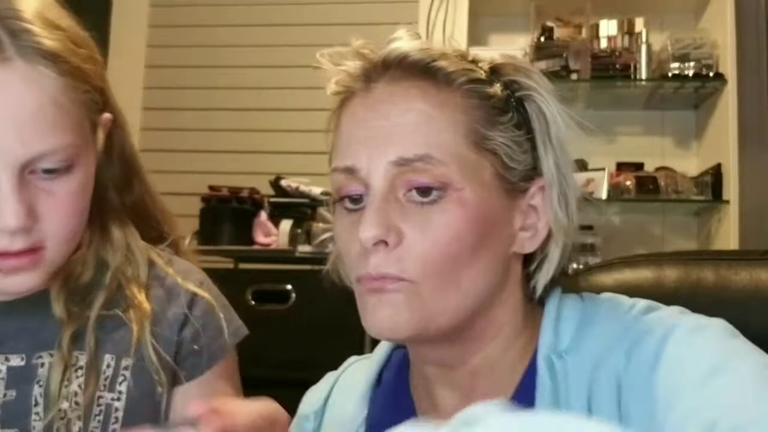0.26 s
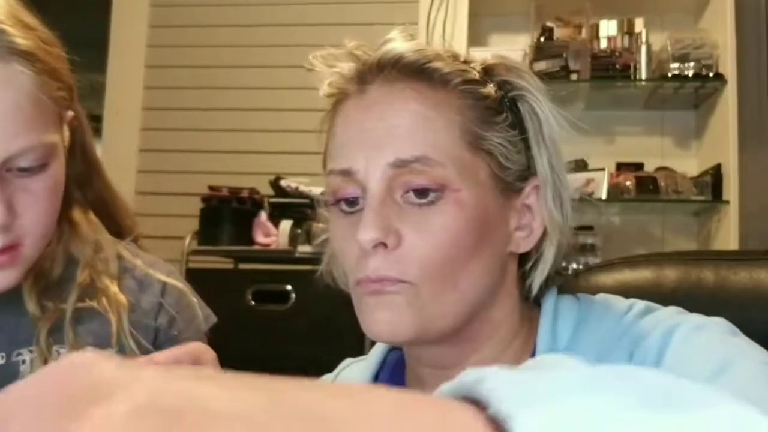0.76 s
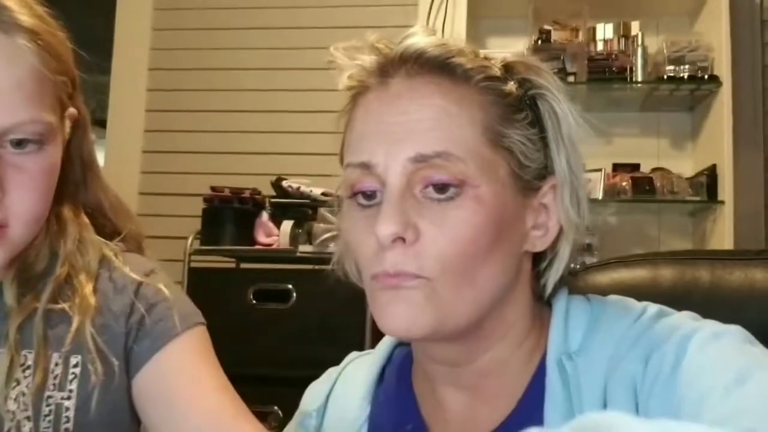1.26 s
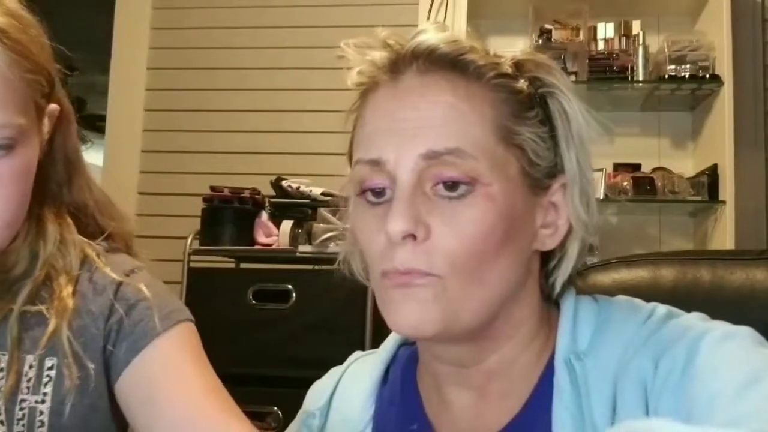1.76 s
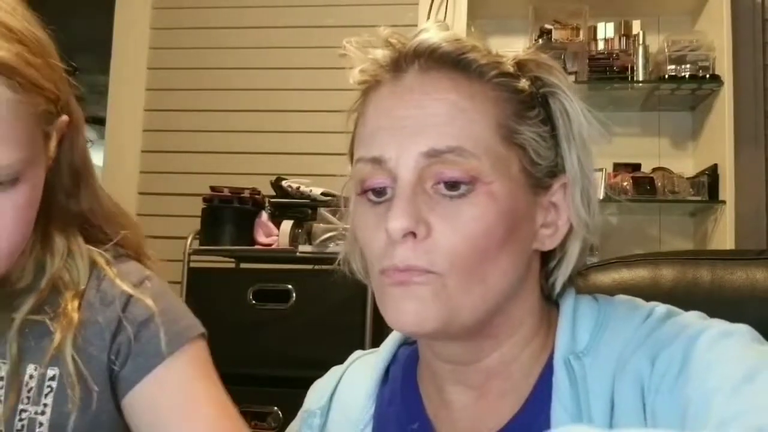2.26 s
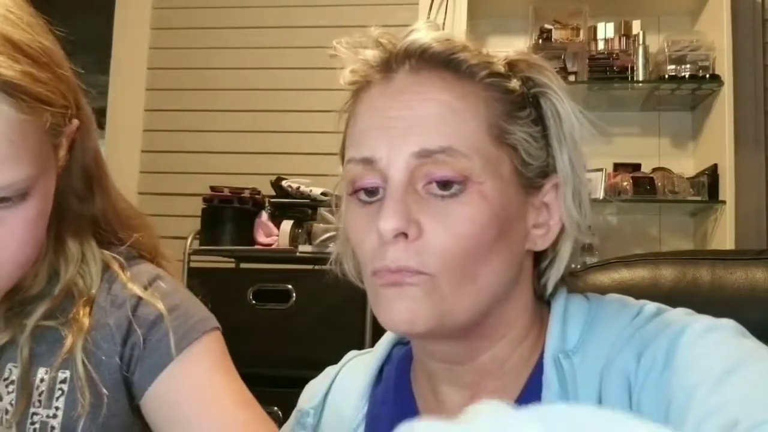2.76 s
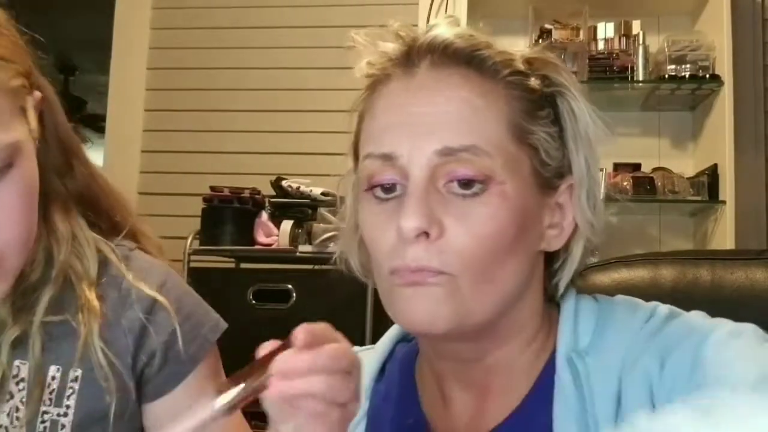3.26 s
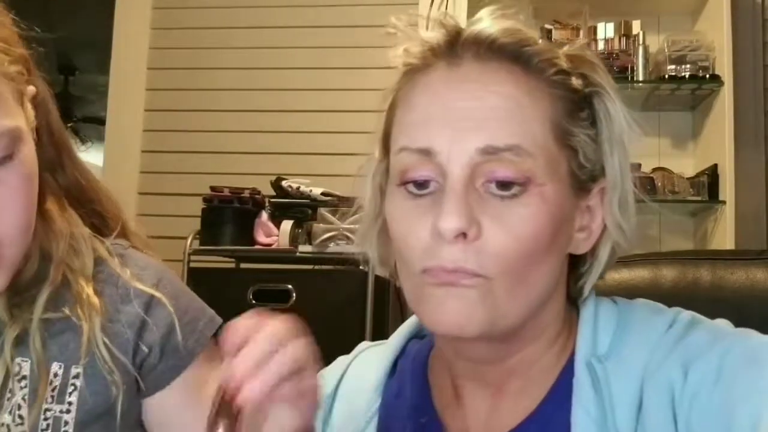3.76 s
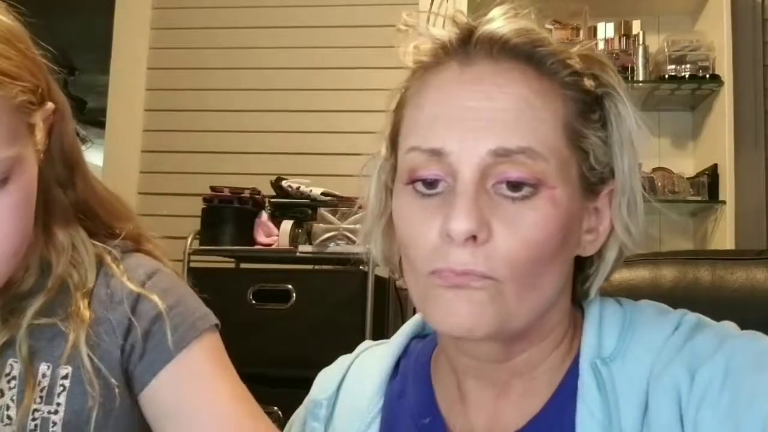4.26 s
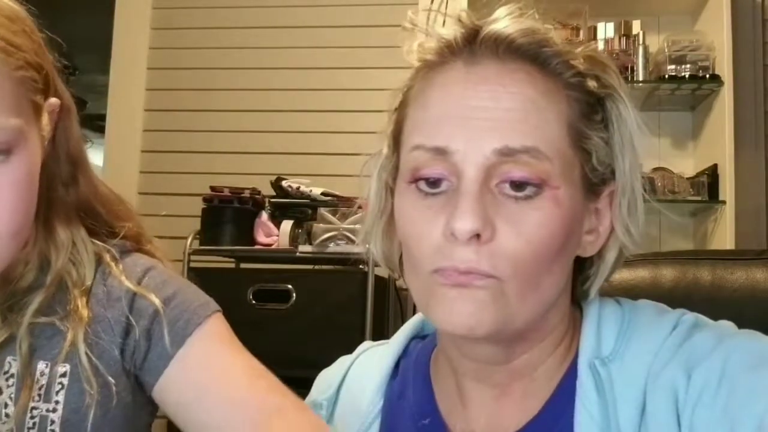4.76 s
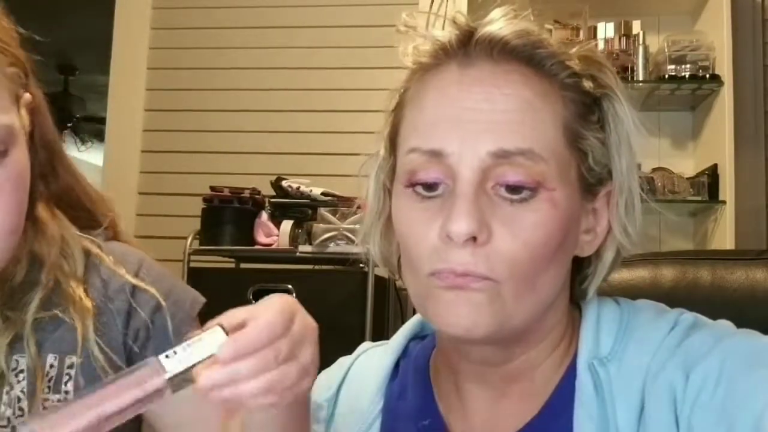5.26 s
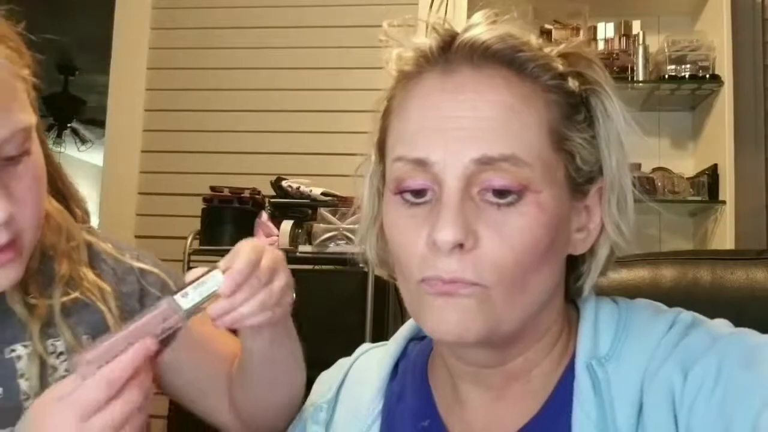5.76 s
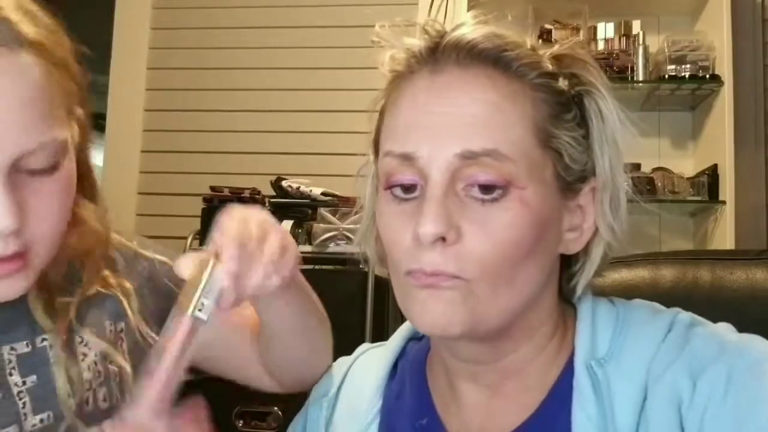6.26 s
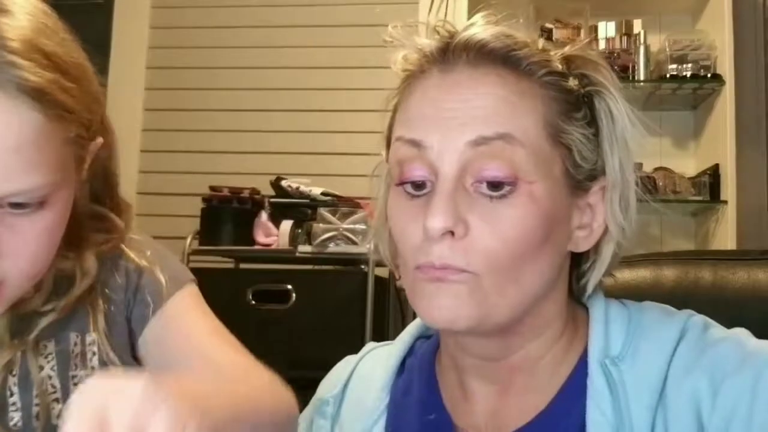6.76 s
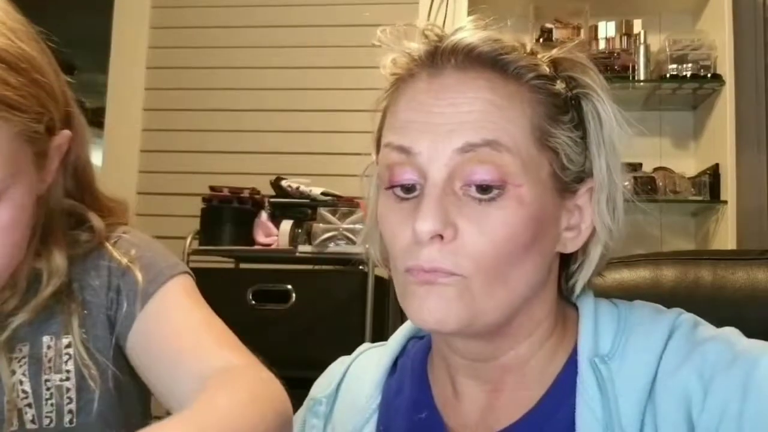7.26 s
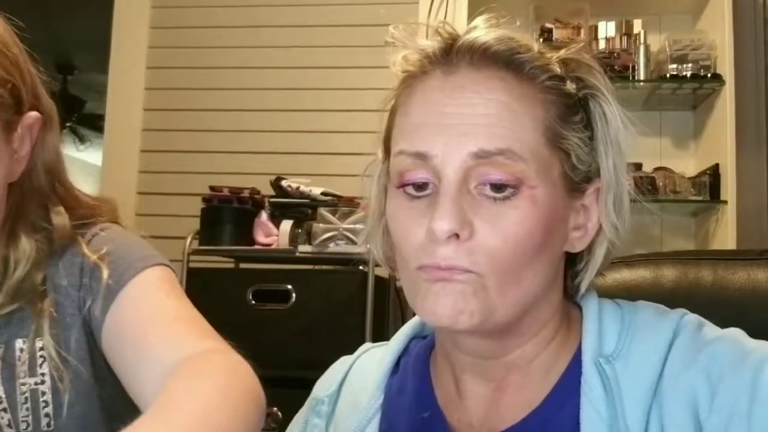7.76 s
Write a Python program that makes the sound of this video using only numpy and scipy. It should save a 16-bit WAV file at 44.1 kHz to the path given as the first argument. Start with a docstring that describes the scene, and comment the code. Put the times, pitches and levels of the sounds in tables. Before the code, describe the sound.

Hard plastic makeup cases and tubes clatter, click and scrape on a table in a small quiet room, with uneven pauses between handlings.

```python
"""A small room: plastic makeup cases and tubes are picked up, sorted and set down on a table close by.
Contacts sum damped modes of cases and table with noise bursts for the clicks of hard shells.
Shaped noise and slip impulses make the slides and rummaging; swept sines make a squeak and a chirp.
Sleeves rumble in low noise over a quiet room tone; short noise tails give the room's answer."""
import sys
import numpy as np
from scipy import signal
from scipy.fft import rfft, irfft, next_fast_len
from scipy.io import wavfile
from scipy.ndimage import map_coordinates

SR = 44100
rng = np.random.default_rng(int(sys.argv[2]) if len(sys.argv) > 2 else 0)


def store_pcm(level_fs):
    """Save levels as 16-bit WAV."""
    pcm = np.round(np.clip(level_fs, -1, 1) * 32767).astype(np.int16)
    wavfile.write(sys.argv[1], SR, np.atleast_2d(pcm).T)


N = 352844
HIT_T = np.arange(6144) / SR  # time axis of one hit [s]
BLOW = round(0.012 * SR)  # opening of a hit that sets its level [samples]
CASE_HZ = 1204  # pitch of a typical case

# modes of table and cases: (frequency [Hz], relative level [dB], t60 [s])
BODY_MODES = [(146, -19, 0.18), (380, -10, .03), (463, -1, 0.039), (536, -0.5, .035), (611, 6, 0.03),
              (794, -2.5, 0.025), (914.4, -3, 0.047), (995, -0.5, 0.051), (1116, -1.5, 0.071),
              (1271, 0, .052), (1424, 0, 0.04), (1588.4, -8.5, 0.057), (1766, 1, 0.058), (1902, 4, 0.029),
              (2215, -9.5, .05), (2398, -7, .05), (2493, -4.5, 0.087), (2891, -13.5, 0.03)]
# low, middle and high range of the modes: (from [Hz], to [Hz])
MODE_RANGES = [(130, 700), (700, 1600), (1700, 2900)]
# spectrum of arm and hand weight on the table: (frequency [Hz], relative level [dB])
RUMBLE_SPECTRUM = [(30, -37.5), (70, 4.5), (115, -4.5), (155, 11), (220, -2), (390, -4), (520, -20.5),
                   (2500, -53.5)]
# a hand reaches in: (start [s], end [s], arm rumble [dB], finger rub [dB])
HAND_REACHES = [(0, .68, -54.5, -59), (1.4, 2.31, -54.5, -61.5), (2.399, 2.613, -47.5, -49),
                (3.051, 3.952, -57.5, -65.5), (4.049, 4.854, -57, -61.5), (4.948, 5.549, -55.5, -55),
                (5.598, 6.162, -61.5, -75), (6.357, 7.248, -49.5, -52), (7.372, 7.814, -56, -60.5)]


def amp(db):
    """Decibels to gain."""
    return 10 ** (np.asarray(db) / 20)


def unit(x):
    """Scale to rms 1."""
    return x / np.sqrt(np.mean(x ** 2) + 1e-20)


def unit_blow(x):
    """Scale a hit to rms 1 over its opening."""
    return x / np.sqrt(np.mean(x[..., :BLOW] ** 2) + 1e-20)


def along(points, hz):
    """Interpolate (Hz, value) points on a log frequency axis."""
    f, v = np.transpose(points)
    return np.interp(np.log(hz + 1), np.log(f), v)


def wobble(rate_hz, size=N):
    """Smooth random curve with rate_hz knots a second."""
    knots = rng.standard_normal(int(size * rate_hz / SR) + 4)
    return map_coordinates(knots, [np.arange(size) * rate_hz / SR])


def spread(hz):
    """Mid-side angle: the channels agree in the bass and less towards the treble."""
    # (frequency [Hz], correlation of left and right [0-1])
    likeness = [(100, 0.96), (500, 0.77), (1200, 0.74), (2400, 0.36), (4500, 0.019)]
    return np.arccos(np.clip(along(likeness, hz), 0, 1)) / 2


def noise(gain, size=N):
    """Stereo noise of rms 1, coloured by a gain function of frequency."""
    m = next_fast_len(size)
    hz = np.fft.rfftfreq(m, 1 / SR)
    mid_side_gain = [np.cos(spread(hz)), np.sin(spread(hz))]
    spectrum = rfft(rng.standard_normal((2, m))) * gain(hz) * mid_side_gain
    mid, side = irfft(spectrum, m)[:, :size]
    return unit(np.array([mid + side, mid - side]))


def colour(points, ripple_db=0):
    """Gain function of a spectrum, with random ripples along it."""
    knots_hz = np.linspace(0, SR / 2, 64)
    ripple = ripple_db * rng.standard_normal(len(knots_hz))
    return lambda hz: amp(along(points, hz) + np.interp(hz, knots_hz, ripple))


def fade(t60_s, attack_s):
    """Envelope of a blow: exponential rise and decay."""
    return amp(-60 * HIT_T / t60_s) * (1 - np.exp(-HIT_T / attack_s))


def modes_within(lo_hz, hi_hz):
    """Body modes of one frequency range."""
    return [mode for mode in BODY_MODES if lo_hz <= mode[0] < hi_hz]


def ring(modes, scatter_db, attack_s):
    """Damped modes start nearly in step, so close ones beat; their phase differs between channels."""
    hz, db, t60_s = np.transpose(modes)[:, :, None]
    strength, start, offset = rng.standard_normal((3, len(hz), 1))
    swing = amp(db + scatter_db * strength) * fade(t60_s, attack_s)
    phase = 2 * np.pi * (hz * HIT_T + 0.12 * start)
    channels = [np.sum(swing * np.sin(phase + side * offset * spread(hz)), axis=0) for side in (1, -1)]
    return unit_blow(np.array(channels))


def add(track, start_s, sound):
    """Mix a sound into a track at a time."""
    i = max(round(start_s * SR), 0)
    part = track[:, i:i + sound.shape[1]]
    part += sound[:, :part.shape[1]]


def noise_burst(gain, t60_s, attack_s):
    """Coloured noise struck once and dying away."""
    return unit_blow(noise(gain, size=len(HIT_T)) * fade(t60_s, attack_s))


def shell_click():
    """A sharp snap and the dense ringing of a hard shell, a few modes standing out."""
    # (frequency [Hz], relative level [dB])
    click_spectrum = [(1500, -32.5), (3000, 2), (3600, -7), (4400, 5), (5300, 4.5), (6500, -3), (8300, 3),
                      (11000, -10.5), (14300, -5)]
    snap = noise_burst(colour(click_spectrum), t60_s=0.0013, attack_s=0.00024)
    dense = noise_burst(colour(click_spectrum, ripple_db=1.0), t60_s=0.03, attack_s=0.00063)
    clear_modes = [(hz, 0, 0.045) for hz in rng.uniform(4000, 12500, size=7)]
    clear = ring(clear_modes, scatter_db=2.5, attack_s=0.00035)
    return unit_blow(dense + amp(-6.5) * snap + amp(-6) * clear)


def body_band(edges_hz, crack_db, crack_t60_s):
    """Modes of one range ring together with a noise crack that stands for many damped ones."""
    lo, hi = edges_hz
    band = lambda hz: 1 / (1 + (lo / (hz + 1)) ** 8) / (1 + (hz / hi) ** 12)
    crack = noise_burst(band, crack_t60_s, attack_s=0.0017)
    return unit_blow(ring(modes_within(lo, hi), scatter_db=4.0, attack_s=0.0015) + amp(crack_db) * crack)


def contact(pitch_hz, knock_db, click_db, thud_under_db):
    """A contact thuds in the table, knocks a hollow case, clacks and clicks in its hard shell."""
    low, middle, high = MODE_RANGES
    # smaller, higher cases clack more and thud less
    small_db = 11.5 * np.log2(pitch_hz / CASE_HZ)
    thud_db = knock_db + thud_under_db - small_db
    # clack level follows a point between knock and click
    clack_db = knock_db + 0.3 * (click_db - knock_db) - 6.5 + small_db

    thud = body_band(low, crack_db=-12, crack_t60_s=0.031)
    case = ring([(pitch_hz, 0, 0.035)], scatter_db=0, attack_s=0.00077)
    knock = unit_blow(body_band(middle, crack_db=-10, crack_t60_s=0.062) + amp(-2.0) * case)
    clack = body_band(high, crack_db=-5.5, crack_t60_s=0.075)
    hit = amp(thud_db) * thud + amp(knock_db) * knock
    hit = hit + amp(clack_db) * clack + amp(click_db) * shell_click()
    return amp(-3.0) * hit


def set_downs():
    """A faint click leads each landing; the case lands with the hand's weight and drops onto its other edge."""
    # (landing [s], case pitch [Hz], relative knock [dB], relative click [dB], hand thump [dB]); the row at
    # 1.046 s is a ringing tap of one case on another, played like a landing
    landings = [(0.092, 900, -31, -35, -39.5), (0.135, 1850, -27, -33, -43),
                (0.991, 523, -40.5, -49.5, -64.5), (1.046, 1125, -18, -49, -61),
                (1.461, 1147, -20.5, -35.5, -45), (2.307, 1075, -8.5, -27.5, -59.5),
                (3.638, 1908, -10.5, -27, -51), (3.655, 1284, -14.5, -36, -62.5),
                (3.684, 1078, -9, -27.5, -42.5), (4.111, 1004, -9.5, -21.5, -42),
                (4.2692, 1275, -21, -25, -50), (4.677, 1320, -22.5, -37, -40.5),
                (4.997, 1022, -19, -34.5, -53.5), (5.166, 1170, -21.5, -37.5, -56),
                (5.2892, 1060, -28.5, -36, -50), (5.391, 1147, -24, -28.5, -43),
                (5.615, 1073, -26.5, -25.5, -43), (5.733, 932, -11, -25, -39.5),
                (6.079, 1147, -25, -35, -44), (6.522, 1225, -9, -26, -32.5), (6.91, 1090, -8.5, -21, -35),
                (7.09, 1070, -26.5, -34, -46.5)]
    lead_s, lead_db = 0.0039, -21.5  # level relative to click_db
    rebound_delay_s, rebound_db = 0.008, -13
    thud_under_db = -17
    out = np.zeros((2, N))
    for s, pitch_hz, knock_db, click_db, thump_db in landings:
        thump = noise_burst(colour(RUMBLE_SPECTRUM), t60_s=0.11, attack_s=0.0019)
        landing = contact(pitch_hz, knock_db, click_db, thud_under_db)
        rebound = contact(pitch_hz, knock_db, click_db, thud_under_db)
        add(out, s - lead_s, amp(click_db + lead_db) * shell_click())
        add(out, s, landing + amp(thump_db) * thump)
        add(out, s + rebound_delay_s * rng.uniform(0.75, 1.25), amp(rebound_db) * rebound)
    return out


def taps():
    """Cases and tubes of slightly different pitch touch each other and hardly stir the table."""
    # (time [s], relative knock [dB], relative click [dB])
    touches = [(0.059, -45, -43), (0.2129, -37, -36.5), (0.238, -30, -34), (0.302, -45, -39),
               (0.39, -52, -41), (0.422, -34, -32.5), (0.43, -27.5, -37), (0.442, -23.5, -65),
               (0.482, -29.5, -52), (0.618, -45.5, -61), (0.696, -49, -82), (0.834, -50, -62.5),
               (1.186, -45, -60), (1.222, -36, -25.5), (1.246, -37.5, -32.5), (1.383, -35, -37.5),
               (1.682, -47.5, -37.5), (1.793, -32, -38), (1.866, -39.5, -57), (2.058, -33.5, -47),
               (2.125, -45.5, -40.5), (2.151, -40, -42), (2.434, -26.5, -29), (2.4768, -34, -31.5),
               (2.571, -48, -46), (2.95, -40, -53.5), (3.086, -35, -37), (3.354, -39.5, -52),
               (3.429, -35, -36), (3.542, -36.5, -37), (3.744, -39, -48), (3.8046, -31, -68),
               (3.859, -31, -64), (4.057, -35.5, -42.5), (4.189, -37, -40.5), (4.257, -34, -46),
               (4.449, -34.5, -66), (4.492, -32, -66), (4.65, -52, -33), (4.706, -24, -44),
               (5.064, -23.5, -49), (5.085, -24.5, -39.5), (5.101, -29.5, -35.5), (5.1333, -26.5, -35.5),
               (5.411, -36, -37.5), (5.707, -32, -34.5), (5.86, -39.5, -40.5), (6.031, -33, -51.5),
               (6.369, -43.5, -49.5), (6.427, -27, -26), (6.606, -33, -28), (6.786, -36, -34.5),
               (6.827, -35.5, -40), (6.993, -43, -40), (7.016, -33, -34.5), (7.11, -37.5, -44.5),
               (7.172, -31.5, -68), (7.399, -40.5, -45), (7.412, -31.5, -44.5), (7.584, -38, -31.5),
               (7.616, -54, -35.5), (7.663, -33.5, -38.5), (7.727, -31.5, -45), (7.89, -52.5, -53)]
    out = np.zeros((2, N))
    for s, knock_db, click_db in touches:
        pitch_hz = CASE_HZ * np.exp(0.07 * rng.standard_normal())
        add(out, s, contact(pitch_hz, knock_db, click_db, thud_under_db=-20.5))
    return out


def friction(size, hiss_db, body_db):
    """Rubbed plastic hisses; the more it stirs the hollow cases, the more it catches and rattles."""
    # both: (frequency [Hz], relative level [dB])
    hiss_spectrum = [(900, -54.5), (2500, 1.5), (3400, 1.5), (5200, 4), (7200, -1), (10000, -1),
                     (14300, -7)]
    scrape_spectrum = [(200, -9), (750, -14), (1000, 0.5), (1250, -10.5), (1600, -3.5), (2400, -11),
                       (4500, -47.5)]
    slips_per_s = 190
    slips = (rng.random(size) < slips_per_s / SR) * rng.exponential(size=size) ** 1.6
    catches = signal.fftconvolve(slips, fade(t60_s=0.018, attack_s=0.0003))[:size]
    catches = unit(catches + 0.1)
    bumpy = 1 / (1 + amp(hiss_db - body_db - 3.5))  # share of catches in the grip
    grip = unit(bumpy * catches + 1 - bumpy)

    hiss = unit(noise(colour(hiss_spectrum, ripple_db=1.5), size=size) * grip)
    scrape = unit(noise(colour(scrape_spectrum), size=size) * grip)
    # every slip also rings the hollow cases
    hollow = ring(modes_within(*MODE_RANGES[1]), scatter_db=7.5, attack_s=0.003)
    rattle = unit(signal.fftconvolve(slips[None], hollow, axes=1)[:, :size])
    body = unit(scrape + amp(1.5) * rattle)
    return signal.windows.tukey(size, 0.3) * (amp(hiss_db) * hiss + amp(body_db) * body)


def slides():
    """Cases are dragged over the table in short strokes of friction."""
    # (start [s], end [s], hiss [dB], body [dB])
    strokes = [(0, 0.086, -48, -47.5), (0.092, 0.163, -34, -30), (.165, 0.346, -45, -43),
               (0.42, 0.482, -51, -41.5), (0.991, 1.031, -60, -44.5), (1.246, 1.282, -39, -46.5),
               (1.435, 1.464, -46.5, -38), (2.441, 2.508, -55, -38), (4.583, 4.658, -52, -74.5),
               (4.651, 4.698, -37.5, -41.5), (5.304, 5.454, -50.5, -49), (5.854, 5.919, -47, -45.5),
               (6.571, 6.665, -45, -49), (6.78, 6.906, -45.5, -40), (7.489, 7.619, -40, -56.5)]
    out = np.zeros((2, N))
    for start, end, hiss_db, body_db in strokes:
        size = max(round((end - start) * SR), BLOW)
        add(out, start, friction(size, hiss_db, body_db))
    return out


def squeak():
    """A rubbed surface sticks and slips unevenly, at a mostly falling rate."""
    # (time [s], pitch [Hz], fundamental [dB], octave [dB])
    glide = [(5.33, 384, -50, -75), (5.363, 374.7, -43, -40), (5.388, 357.3, -42.5, -36),
             (5.43, 359, -44, -82), (5.46, 317, -59, -78)]
    s, *columns = np.transpose(glide)
    t = np.arange(s[0], s[-1], 1 / SR)
    pitch_hz, first_db, octave_db = [np.interp(t, s, c) for c in columns]
    unsteady_hz = pitch_hz * (1 + 0.015 * wobble(166, size=len(t)))
    phase = 2 * np.pi * np.cumsum(unsteady_hz) / SR
    uneven = unit(amp(5 * wobble(251, size=len(t))))
    tone = amp(first_db) * np.sin(phase) + amp(octave_db) * np.sin(2 * phase)
    out = np.zeros((2, N))
    add(out, s[0], (uneven * tone)[None])
    return out


def chirp():
    """Two smooth shells stick and slip in one short, high squeak."""
    start_s, length_s, pitch_hz, level_db = 0.321, 0.03, 3960, -43.5
    size = max(round(length_s * SR), BLOW)
    phase = 2 * np.pi * np.cumsum(pitch_hz * (1 + 0.006 * wobble(302, size=size))) / SR
    out = np.zeros((2, N))
    add(out, start_s, (amp(level_db) * signal.windows.hann(size) * np.sin(phase))[None])
    return out


def fingers():
    """In each reach the fingers rub over the cases and nudge them into faint, random taps."""
    nudges_per_s, nudge_db, scatter_db = 9, -49.5, 2.5
    out = np.zeros((2, N))
    for start, end, _, rub_db in HAND_REACHES:
        length_s = end - start
        size = max(round(length_s * SR), BLOW)
        add(out, start, friction(size, hiss_db=rub_db - 3, body_db=rub_db))
        for share in rng.beta(2, 2, size=max(round(length_s * nudges_per_s), 0)):
            knock = body_band(MODE_RANGES[1], crack_db=-4, crack_t60_s=0.028)
            nudge = knock + amp(-5.5) * shell_click()
            strength_db = nudge_db + scatter_db * rng.standard_normal()
            add(out, start + share * length_s, amp(strength_db) * nudge)
    return out


def sleeves():
    """In each reach an arm and its sleeve shift against the table with a low uneven rumble."""
    out = np.zeros((2, N))
    for start, end, rumble_db, _ in HAND_REACHES:
        size = max(round((end - start) * SR), BLOW)
        uneven = amp(4.6 * wobble(25, size=size))
        rumble = unit(noise(colour(RUMBLE_SPECTRUM), size=size) * uneven)
        add(out, start, amp(rumble_db) * signal.windows.tukey(size, 0.5) * rumble)
    return out


def room(x):
    """The small room answers with a short decaying noise tail, redrawn every third of a second."""
    # (frequency [Hz], t60 [s])
    decay_times = [(200, 0.18), (1200, .24), (14000, 0.052)]
    # (frequency [Hz], tail level [dB])
    tail_levels = [(150, -2.5), (500, -13.5), (1200, -20), (5000, -8.5)]
    delay_s = 0.0056
    out = np.zeros((2, N))
    block = SR // 3
    for i in range(0, N, block):
        hz, t, z = signal.stft(noise(np.ones_like, size=block), SR, nperseg=256)
        decay = amp(-60 * t / along(decay_times, hz)[:, None])
        # equal energy in every band before the level curve
        decay = decay / np.sqrt(np.mean(decay ** 2, axis=1, keepdims=True) * block)
        level = amp(along(tail_levels, hz))[:, None]
        tail = signal.istft(z * decay * level, SR, nperseg=256)[1]
        add(out, i / SR + delay_s, signal.fftconvolve(x[:, i:i + block], tail, axes=1))
    return out


def room_tone():
    """Steady quiet noise, strongest in the bass."""
    # (frequency [Hz], relative level [dB])
    tone_spectrum = [(20, -26), (60, -12.5), (92, 1), (112, -9), (150, -6.5), (240, -17), (380, -17.5),
                     (540, -31), (850, -32.5), (1150, -22), (2000, -35.5), (5200, -33), (14000, -38.5)]
    return amp(-61) * noise(colour(tone_spectrum))


def scene():
    """The handling and its room answer, over sleeves and room tone."""
    handling = set_downs() + taps() + slides() + squeak() + chirp() + fingers()
    balance_db = [[-0.4], [0.4]]  # left, right
    return (handling + room(handling) + sleeves() + room_tone()) * amp(balance_db)


def record(dry):
    """The highest peaks are rounded off; little treble is left above 14.5 kHz and none above 16.6 kHz."""
    # treble limit: (frequency [Hz], level [dB])
    treble_limit = [(14500, 0), (15100, -22), (16400, -34)]
    ceiling, top_hz = 0.93, 16600
    rounded = dry / (1 + (dry / ceiling) ** 8) ** (1 / 8)
    m = next_fast_len(N + SR // 2)
    hz = np.fft.rfftfreq(m, 1 / SR)
    gain = amp(along(treble_limit, hz)) * (hz < top_hz)
    return irfft(rfft(rounded, m) * gain, m)[:, :N]


dry = scene()
out = record(dry)
store_pcm(out)
```